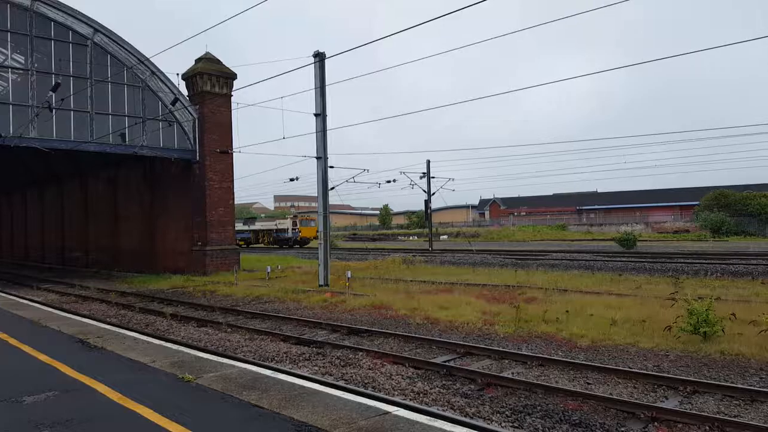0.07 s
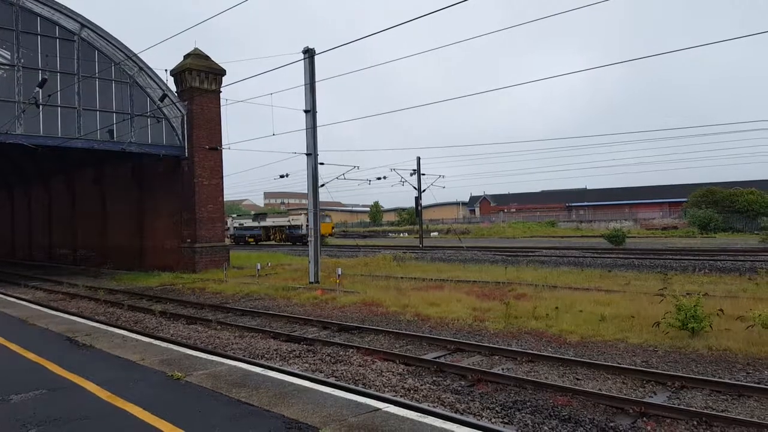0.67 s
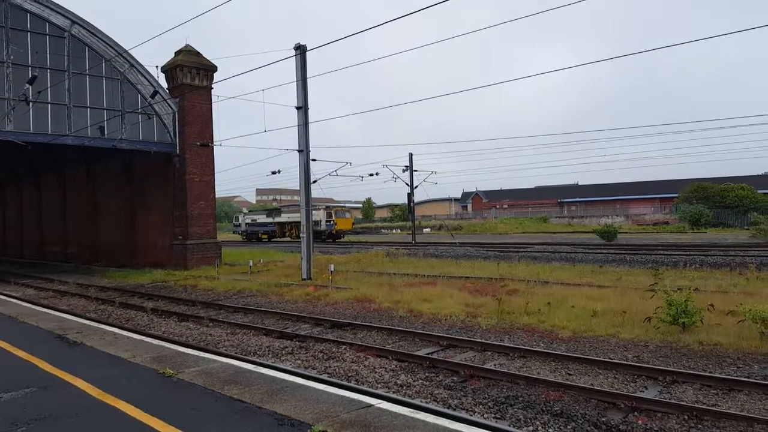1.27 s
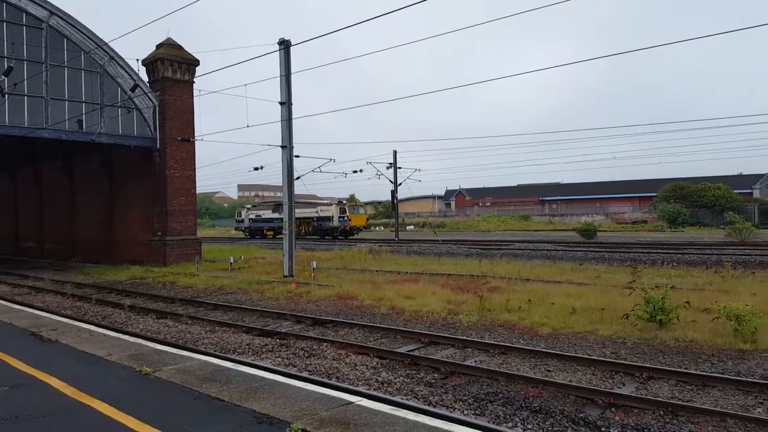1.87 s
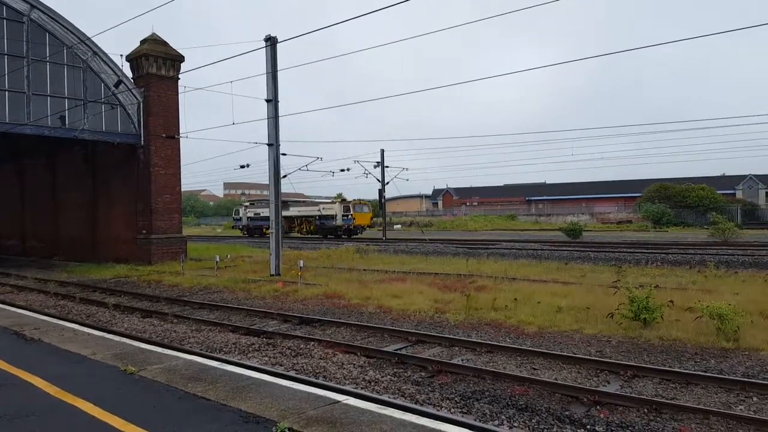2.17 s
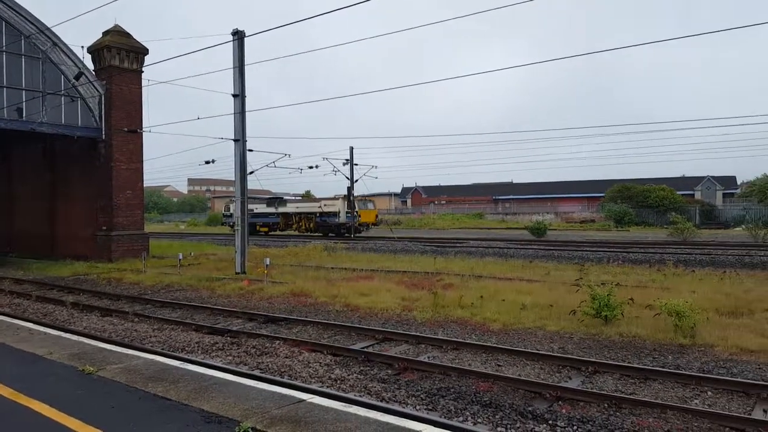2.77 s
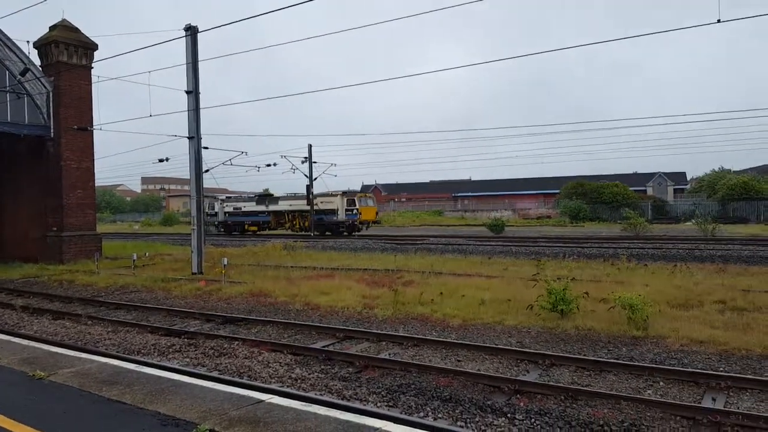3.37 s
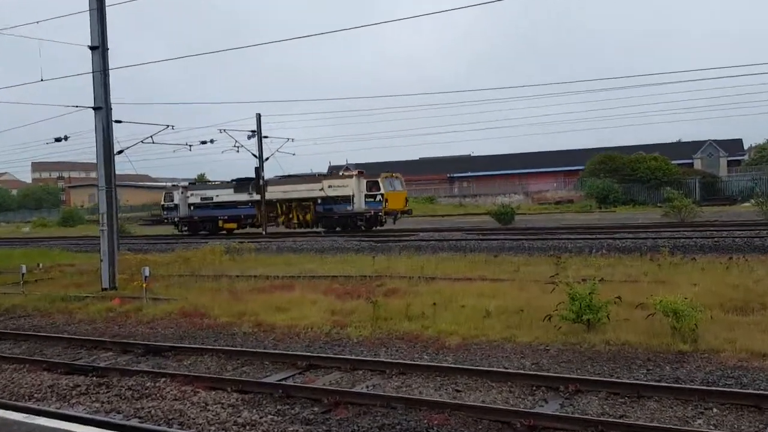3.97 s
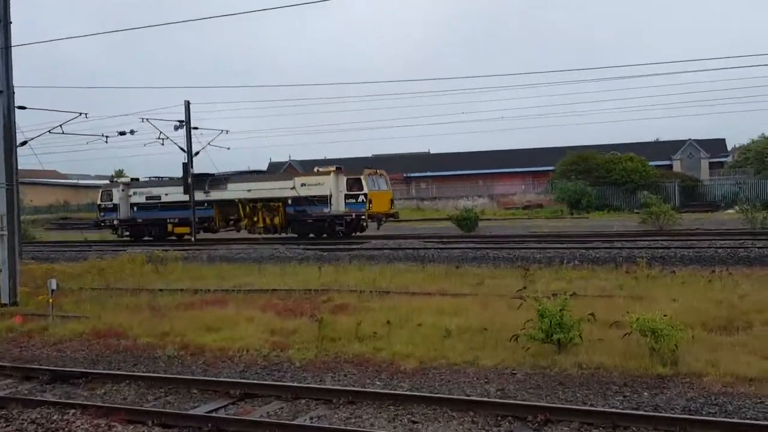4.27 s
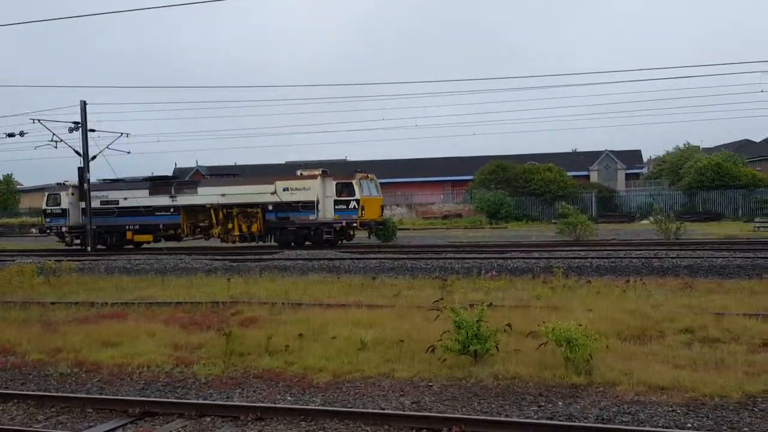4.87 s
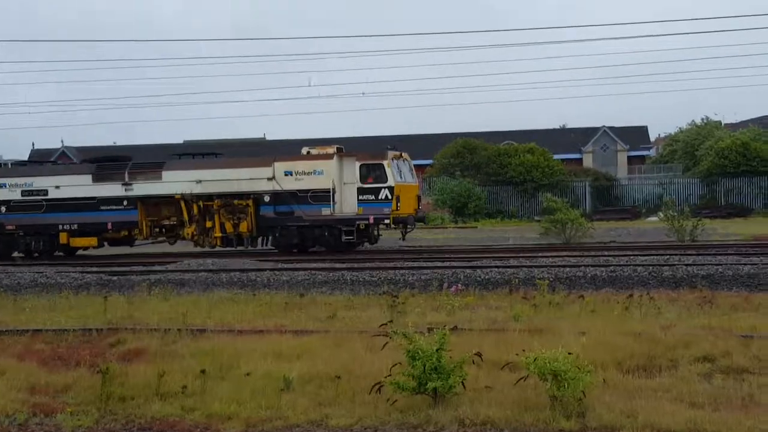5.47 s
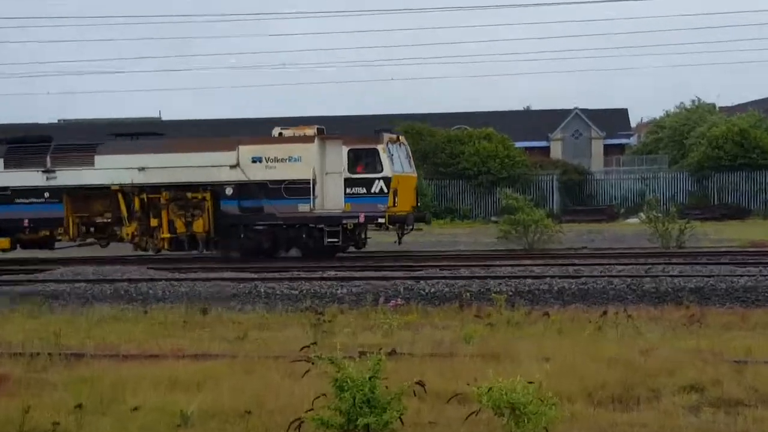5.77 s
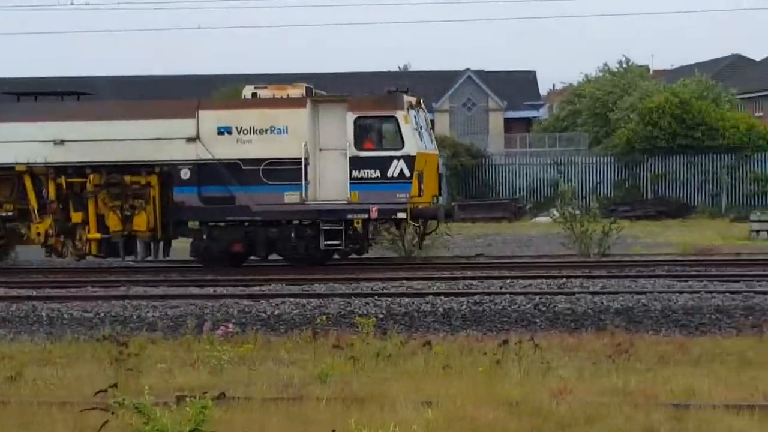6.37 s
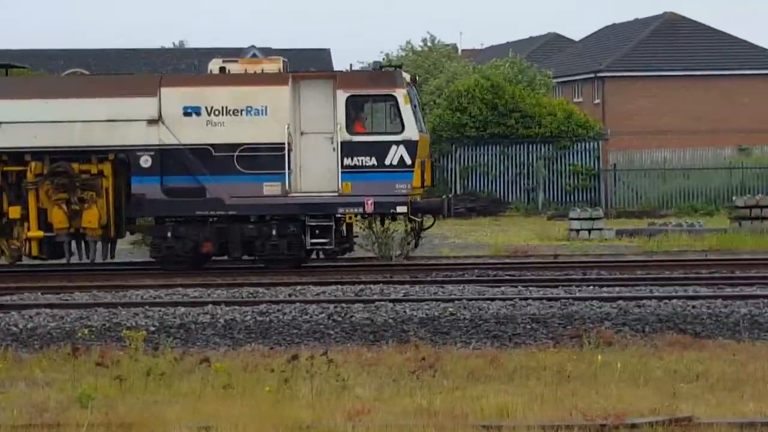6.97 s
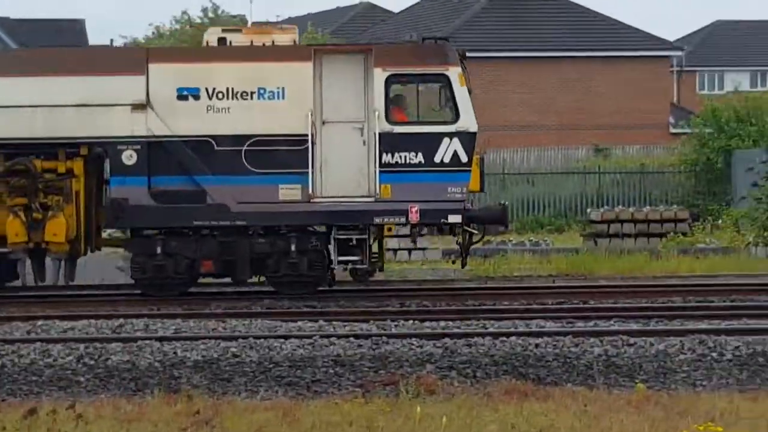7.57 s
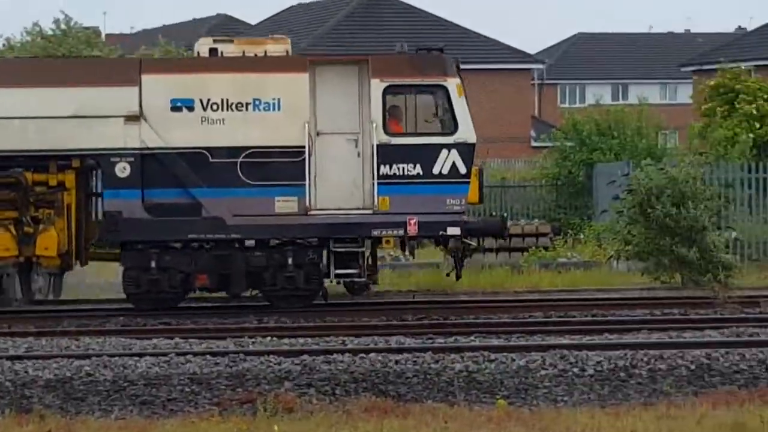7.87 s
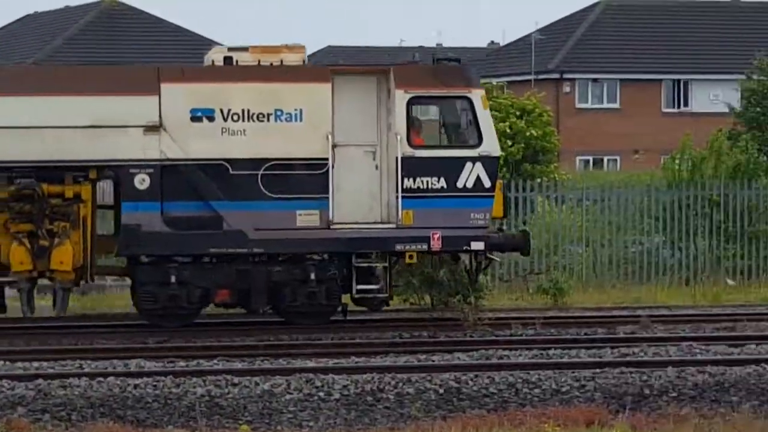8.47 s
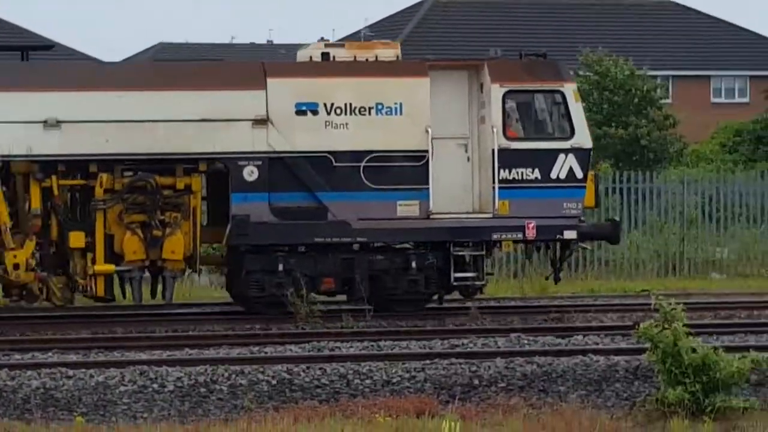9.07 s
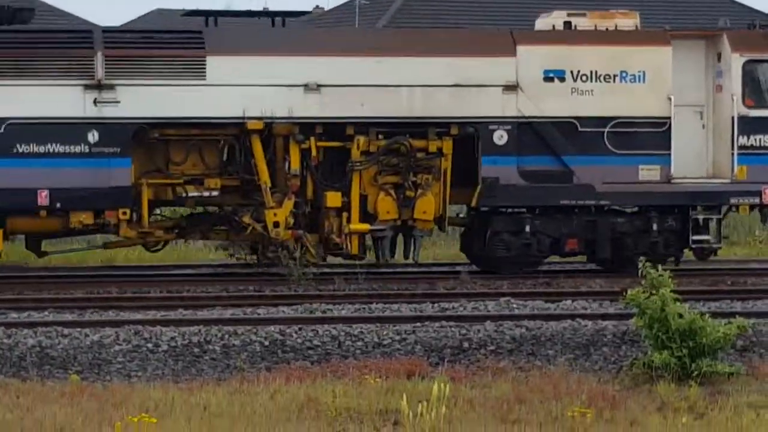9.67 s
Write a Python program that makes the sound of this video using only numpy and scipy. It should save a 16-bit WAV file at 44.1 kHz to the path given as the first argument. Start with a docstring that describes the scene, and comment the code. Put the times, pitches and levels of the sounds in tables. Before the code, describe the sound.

The rumbling, humming diesel engine of a track machine draws nearer, with a brightening rush of wheels and air.

```python
"""On an open-air station platform, a diesel track machine rolls slowly closer and starts to pass.
Its exhaust throbs because eight unequal cylinders fire in turn, over the hollow roar of gas in the pipe.
Belt-driven fans, pumps and gears hum along with the engine, and the turbocharger whistles thinly.
The wheels and cooling air rush and hiss more brightly as the machine nears."""
import sys
import numpy as np
from scipy import signal
from scipy.fft import irfft, next_fast_len
from scipy.io import wavfile
from scipy.ndimage import map_coordinates

SR = 44100
rng = np.random.default_rng(int(sys.argv[2]) if len(sys.argv) > 2 else 0)


def to_wav(sig):
    """Store sig (one row per channel, or 1-D mono) as 16-bit WAV at the path in sys.argv[1].

    Samples outside -1..1 are clipped; the rate is SR.
    """
    pcm = np.clip(np.atleast_2d(sig), -1, 1) * 32767
    pcm = np.round(pcm).astype(np.int16)
    wavfile.write(sys.argv[1], SR, pcm.T)  # frames by channels


N = 428652
TIME = np.arange(N) / SR
SIDES = np.array([[1], [-1]])  # left, right


def from_db(db):
    """Turn decibels into a gain."""
    return 10 ** (np.asarray(db) / 20)


def unit_power(sound):
    """Scale a sound to an average power of 1."""
    return sound / np.sqrt(np.mean(sound ** 2) + 1e-20)


def over_time(points):
    """Join (time, value) points with straight lines."""
    return np.interp(TIME, *np.transpose(points))


def over_pitch(points, hz):
    """Join (pitch, value) points, giving each octave equal room."""
    pitch_hz, value = np.transpose(points)
    return np.interp(np.log(hz), np.log(pitch_hz), value)


def drift(rate_hz):
    """A smooth random wobble of about size 1, changing about rate_hz times a second."""
    pole = np.exp(-200 * np.pi * rate_hz / SR)
    slow = signal.lfilter([1], [1, -2 * pole, pole * pole], rng.standard_normal(N // 100 + 1002))[1000:]
    return np.interp(np.arange(N) / 100, np.arange(len(slow)), unit_power(slow))


def swell(nearness, far_db, near_db, bend=1):
    """A sound grows as the machine nears; a bend under 1 makes it rise early."""
    return from_db(far_db + (near_db - far_db) * nearness ** bend)


# How much louder the left ear is, from afar: pitch_hz, left_minus_right_db
BALANCE_FAR = [(200, -0.5), (400, -1), (1300, -1), (4400, 1.5), (8500, -1), (12000, 3)]
# How alike the two ears sound, from afar: pitch_hz, likeness_0_to_1
ALIKE_FAR = [(25, 0.5), (60, 0.63), (130, .995), (290, 0.99), (640, 0.93), (1410, 0.63), (2500, 0.37),
             (5000, 0.92), (9000, 0), (13000, 0)]
def noise(spectrum, balance=BALANCE_FAR, likeness=ALIKE_FAR):
    """Stereo noise of power 1; the spectrum sets only its tone colour."""
    size = next_fast_len(N, True)
    hz = np.maximum(np.fft.rfftfreq(size, 1 / SR), 1)
    colour_db, alike, lean_db = (over_pitch(points, hz) for points in (spectrum, likeness, balance))
    roll_off = np.minimum(1, np.minimum(hz / spectrum[0][0], spectrum[-1][0] / hz)) ** 6
    shared, opposed = rng.standard_normal((2, len(hz))) + 1j * rng.standard_normal((2, len(hz)))
    ears = np.sqrt(1 + alike) * shared + np.sqrt(1 - alike) * opposed * SIDES
    return unit_power(irfft(ears * roll_off * from_db(colour_db + lean_db * SIDES / 2), size)[:, :N])


# How much louder the left ear is, close up: pitch_hz, left_minus_right_db
BALANCE_NEAR = [(200, -2), (400, -5), (700, -1), (1300, -3), (2200, 0), (3000, -4), (5400, -7.5),
                (7000, -4.5), (8500, 3), (10000, 9.5), (15000, 7)]
# How alike the ears sound beside the long machine: pitch_hz, likeness_0_to_1
ALIKE_NEAR = [(25, .7), (130, .99), (290, 0.65), (640, 0.97), (1410, 0.78), (2200, 0.43), (4500, 0.5),
              (7000, 0.36), (13000, .2)]
def blended_noise(far, near, blend):
    """Noise that passes from its far sound (blend 0) to its near sound (blend 1)."""
    return np.sqrt(1 - blend) * noise(far) + np.sqrt(blend) * noise(near, BALANCE_NEAR, ALIKE_NEAR)


# Two sharp ticks: start_s, level_db
TICKS = [(2.73, -45), (5.422, -42)]
def ticks(ring_s=0.04, left_db=-6, lowest_hz=5000):
    """Tiny dry ticks on the right: bursts of bright noise that die at once."""
    decay = sum(from_db(level_db - 60 * np.clip((TIME - start_s) / ring_s, 0, 10)) * (TIME >= start_s)
                for start_s, level_db in TICKS)
    treble = signal.butter(2, lowest_hz, "high", fs=SR, output="sos")
    return signal.sosfilt(treble, decay * rng.standard_normal((2, N)) / 2) * from_db([[left_db], [0]])


def whistle(hz, breathy=0.52, breath_hz=60):
    """A fluttering tone wrapped in a narrow band of breathy noise, different in each ear."""
    phase = 2 * np.pi * np.cumsum(hz) / SR + 0.8 * drift(5.9)
    ears = []
    for _ in range(2):
        tone = np.sqrt(2 * (1 - breathy)) * np.sin(phase + drift(4))
        breath = drift(breath_hz) * np.sin(phase) + drift(breath_hz) * np.cos(phase)
        ears.append(tone + np.sqrt(breathy) * breath)
    return np.array(ears) * from_db(2 * drift(7.7))


# The turbocharger's fainter, higher tones: times_main_pitch, relative_level_db
TURBO_TONES = [(1.346, 1.5), (1.675, -8), (2, -11)]
def turbocharger(nearness, treble_step, start_hz=7935, sink_hz=210):
    """Turbine and compressor whistle on one shaft, sinking ever faster as the machine comes by."""
    hz = start_hz - sink_hz * (TIME / TIME[-1]) ** 1.3
    higher = sum(from_db(level_db) * whistle(ratio * hz) for ratio, level_db in TURBO_TONES)
    higher *= swell(nearness, far_db=-74, near_db=-62.5, bend=1.5)
    main = swell(nearness, far_db=-64, near_db=-51, bend=1.9) * whistle(hz)
    shift_left = from_db(4 * treble_step * SIDES)
    return main + shift_left * higher


# Tone colours of the hiss, the sizzle and the airy top (duller from afar): pitch_hz, level_db
HISS_FAR = [(2000, -6), (2400, -1), (2750, 3), (3100, -5), (3600, -3.5), (4200, -11), (5200, -27)]
HISS_NEAR = [(2000, -11), (2400, 0.5), (2750, 3), (3100, -2.5), (3600, -2), (4300, -6), (5200, -35)]
SIZZLE = [(3800, -1.5), (4600, -1.5), (5400, 0), (6200, -4), (7200, -10.5), (8400, -13)]
AIR_FAR = [(7100, -6), (8300, 1.5), (9500, 0.5), (10800, -3.5), (12500, -7), (15700, -15)]
AIR_NEAR = [(7100, -7), (7700, 2), (8500, -1), (10800, -2.5), (12500, -5.5), (15700, -13)]
def hiss(nearness, treble_step, surge_start_s=1.94, surge_end_s=2.98, surge_edge_s=0.072):
    """Cooling air and wheels hiss; a sizzle surges once, then later steps up and stays."""
    surge = np.clip(np.minimum(TIME - surge_start_s, surge_end_s - TIME) / surge_edge_s, 0, 1)
    body = blended_noise(HISS_FAR, HISS_NEAR, nearness)
    body *= swell(nearness, far_db=-48.5, near_db=-39.5, bend=1.6)
    sizzle = blended_noise(SIZZLE, SIZZLE, treble_step) * from_db(4.5 * treble_step + 2.7 * surge)
    sizzle *= swell(nearness, far_db=-53.5, near_db=-47.5, bend=2.03)
    air = blended_noise(AIR_FAR, AIR_NEAR, treble_step)
    air *= swell(nearness, far_db=-66.5, near_db=-54, bend=0.24)
    flutter = from_db(0.5 * drift(21))
    return (body + sizzle + air) * flutter


# Hums of the belt-driven parts: times_cycle_rate, far_db, near_db
HUMS = [(23.22, -52, -38.5), (30.56, -56, -40.5), (38.98, -57, -51), (46.88, -47.5, -49),
        (61.08, -57, -44.5), (117.3, -51, -51)]
# Swells of the hums above, plus one brief higher hum, each peaking as it points at the platform: peak_s,
# half_width_s, times_cycle_rate, level_db
HUM_SWELLS = [(1.25, .35, 46.88, -46), (3.35, .5, 138.9, -50), (4.2, 1.0, 46.88, -45),
              (6.8, .7, 117.3, -46)]
def fans_pumps_and_gears(cycles, nearness, waver_db=2.5, waver_rad=0.45):
    """Spinning parts follow the engine's speed; moving air makes their tones waver."""
    tones = [(multiple, swell(nearness, far_db, near_db)) for multiple, far_db, near_db in HUMS]
    tones += [(multiple, from_db(level_db) * np.exp(-((TIME - peak_s) / half_width_s) ** 2))
              for peak_s, half_width_s, multiple, level_db in HUM_SWELLS]
    hum = np.zeros(N)
    for multiple, level in tones:
        gain = level * from_db(waver_db * drift(4.3))
        hum += gain * np.sqrt(2) * np.sin(2 * np.pi * multiple * cycles + waver_rad * drift(2.8))
    return hum


# Tone colour of the low clatter: pitch_hz, level_db
CLATTER = [(220, -28), (305, 0), (355, -0.5), (405, 4.5), (460, -2.5), (520, -6), (620, -15), (900, -19)]
# Tone colours of the rush, with dips from the echo off the ground: pitch_hz, level_db
RUSH_FAR = [(400, -29), (580, -7.5), (780, 0.5), (1000, -7.5), (1250, -5), (1400, -12.5), (1490, -19.5),
            (1620, -6), (1850, -6.5), (2150, -9.5), (2350, -29), (3000, -49)]
RUSH_NEAR = [(400, -21), (580, -4.5), (760, 1.5), (1000, -2.5), (1350, -1.5), (1520, -9), (1850, -3.5),
             (2150, -9.5), (2400, -15), (3200, -46)]
def running_gear(cycles, nearness):
    """Engine block and wheels clatter and rush, knocking lightly each time a cylinder fires."""
    clatter = swell(nearness, far_db=-45, near_db=-31.5, bend=0.76) * noise(CLATTER)
    rush = blended_noise(RUSH_FAR, RUSH_NEAR, nearness)
    rush *= swell(nearness, far_db=-36, near_db=-29.5, bend=0.54)
    knock = 1 + 0.053 * np.cos(2 * np.pi * len(CYLINDERS) * cycles)
    flutter = from_db(0.67 * drift(35))
    return (clatter + rush) * knock * flutter


def wall_gain(loss_db=7, clear_s=1.74):
    """A wall screens the exhaust at first, until the machine comes out from behind it."""
    return from_db(-loss_db * np.clip(1 - TIME / clear_s, 0, 1))


# Tone colours of the deep rumble and the hollow roar: pitch_hz, level_db
RUMBLE = [(15, -27), (25, -23), (40, -2), (60, -6.5), (98, 1), (125, -1.5), (165, -4), (205, 1.5),
          (280, -11), (400, -39)]
ROAR = [(130, -38), (185, -15), (206, -6.5), (218, 1.5), (238, -5.5), (265, -10), (310, -32), (420, -55)]
# Rise and fall of the pipe's roar and of the exhaust's high tones: time_s, relative_level_db
PIPE_LEVEL = [(0.7, -31.5), (3.34, -29.5), (3.59, -32), (4.82, -26.5), (4.97, -33), (5.4, -26.5),
              (6.75, -25.5), (8.04, -30.5), (8.41, -25), (9.72, -30)]
def exhaust_gas(cycles, nearness):
    """Swirling gas rumbles and rings in the pipe, puffing twice per engine cycle."""
    puffs = 1 + 0.19 * np.cos(4 * np.pi * cycles)
    rumble = swell(nearness, far_db=-34.5, near_db=-30.5, bend=0.5) * wall_gain() * noise(RUMBLE)
    roar = from_db(over_time(PIPE_LEVEL) - 3) * noise(ROAR)
    return puffs * (rumble + roar)


# Strength of the eight cylinders, in firing order: level_db
CYLINDERS = [-5, -2, -1, 0, -7, -8, -7, -2]
# The tones that make up the throb: times_cycle_rate, relative_level_db
EXHAUST_TONES = [(2, -44), (3, -32), (4, -14), (5, -5), (6, -18.5), (7, -30), (8, -1), (9, -9.5),
                 (10, -3.5), (11, -1.5), (12, -10.5), (13, -8.5), (14, -18.5), (15, -16), (16, -17.5),
                 (17, -22), (18, -17.5), (19, -22.5), (21, -29.5), (22, -25.5), (26, -26.5), (28, -26.5),
                 (29, -30.5)]
# The firing note swells and fades along the way: time_s, relative_level_db
FIRING_LEVEL = [(0.7, -30), (0.95, -30.5), (0.97, -44), (1.1, -33), (1.55, -25.5), (3.61, -32),
                (4.37, -22.5), (4.72, -32), (5.42, -22.5), (7.36, -25.5), (8.46, -20.5), (8.64, -24),
                (9.49, -20.5), (9.72, -26)]
def exhaust_throb(cycles, nearness, waver_db=1, waver_rad=0.11, spread_rad=0.09):
    """Unequal cylinders sound tones at whole multiples of the engine's cycle rate."""
    boom = swell(nearness, far_db=-30.5, near_db=-25, bend=0.6) * wall_gain() ** 2
    firing = from_db(over_time(FIRING_LEVEL) + 1)
    throb = swell(nearness, far_db=-27, near_db=-25, bend=2.8) * wall_gain()
    top = from_db(over_time(PIPE_LEVEL) + 3.5)
    cylinder_phases = np.angle(np.fft.fft(from_db(CYLINDERS)))
    sound = np.zeros((2, N))
    for multiple, level_db in EXHAUST_TONES:
        level = boom if multiple < 7 else firing if multiple < 9 else throb if multiple < 13 else top
        silencer = np.pi * multiple ** 2 / 24  # delays the lows, so each beat sweeps downward
        phase = 2 * np.pi * multiple * cycles + cylinder_phases[multiple % len(CYLINDERS)] + silencer
        phase += waver_rad * drift(2.3)
        between_ears = spread_rad * drift(1) / 2 * SIDES
        gain = level * from_db(level_db + waver_db * drift(1.36))
        sound += gain * np.sqrt(2) * np.sin(phase + between_ears)
    return sound


# The direction the machine is heard from: time_s, left_ear_lead_ms
DIRECTION = [(1.9, 0.08), (2.02, 0.067), (2.88, 0.055), (3.04, 0.077), (4.2, 0.091), (4.4, 0.098),
             (8.5, 0.11), (9.2, 0.064), (9.72, 0.049)]
def at_ears(sound, travel_samples=16):
    """The sound reaches the left ear a little before the right."""
    lead_samples = over_time(DIRECTION) * SR / 1000
    positions = np.arange(N) - travel_samples + SIDES * lead_samples / 2
    return np.array([map_coordinates(ear, [position], order=5, mode="mirror")
                     for ear, position in zip(sound, positions)])


# The engine's pitch wanders slightly up and down: time_s, cycles_per_s
ENGINE_SPEED = [(0, 15.5), (1.6, 15.9), (3.5, 15.3), (5.3, 15.66), (6.8, 15.5), (8.3, 15.2), (9.72, 15.6)]
# The machine draws level with the platform and starts to pass: time_s, nearness_0_to_1
APPROACH = [(0, 0.16), (1.4, 0), (2.6, 0.11), (3.3, 0.32), (4.3, .6), (6.2, 0.84), (7.7, 1), (9.72, 0.79)]
def scene(pipe_lag_s=1, step_start_s=4.18, step_length_s=0.29):
    """One engine speed and one approach drive the machine's sounds."""
    cycles = np.cumsum(over_time(ENGINE_SPEED)) / SR
    nearness = over_time(APPROACH)
    pipe_nearness = np.interp(TIME - pipe_lag_s, TIME, nearness)  # the exhaust sits far back
    # the treble hiss steps up and shifts between the ears
    treble_step = np.clip((TIME - step_start_s) / step_length_s, 0, 1)
    exhaust = exhaust_throb(cycles, pipe_nearness) + exhaust_gas(cycles, pipe_nearness)
    engine = exhaust + fans_pumps_and_gears(cycles, nearness) + turbocharger(nearness, treble_step)
    return at_ears(engine + running_gear(cycles, nearness) + hiss(nearness, treble_step)) + ticks()


def record(dry, fade_start_s=0.4, fade_length_s=0.34, cutoff_hz=15750):
    """The sound fades in from silence, and the highest treble is cut."""
    fade = np.clip((TIME - fade_start_s) / fade_length_s, 0, 1)
    treble_cut = signal.ellip(12, 0.1, 90, cutoff_hz, fs=SR, output="sos")
    return signal.sosfilt(treble_cut, dry * fade)


dry = scene()
out = record(dry)
to_wav(out)
```